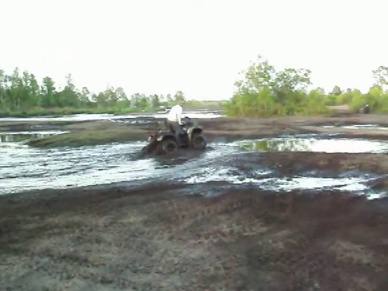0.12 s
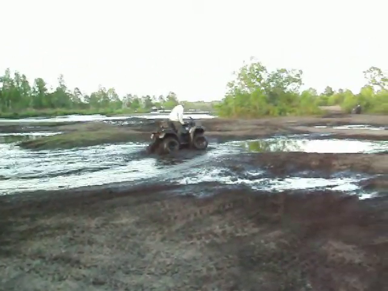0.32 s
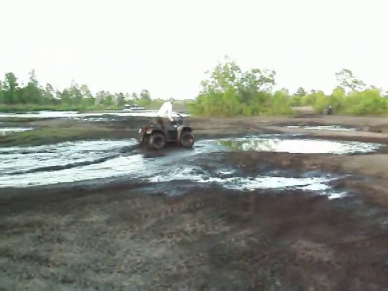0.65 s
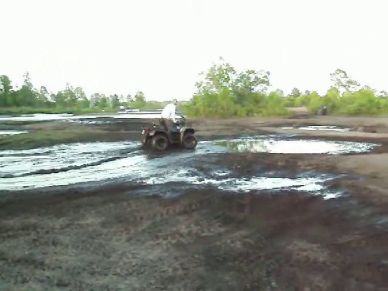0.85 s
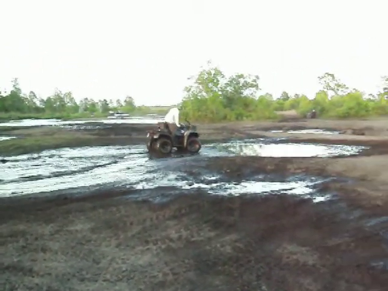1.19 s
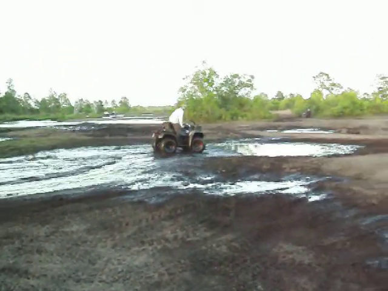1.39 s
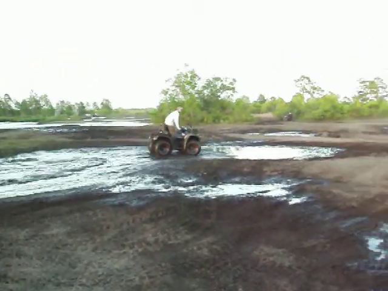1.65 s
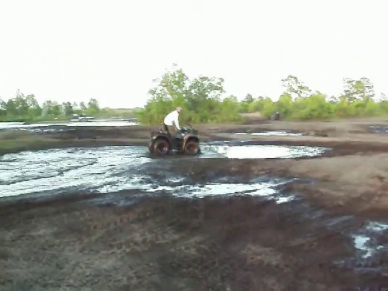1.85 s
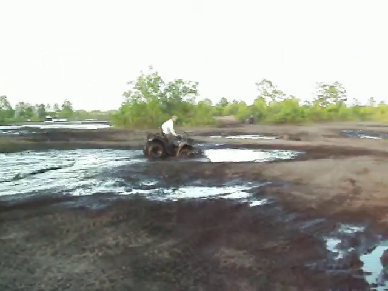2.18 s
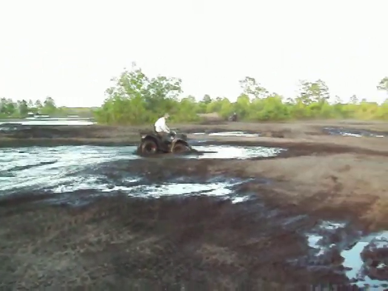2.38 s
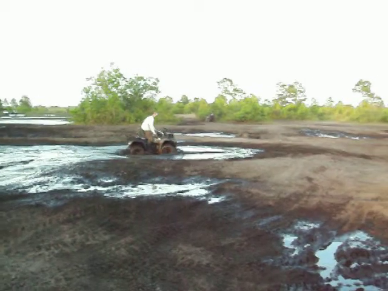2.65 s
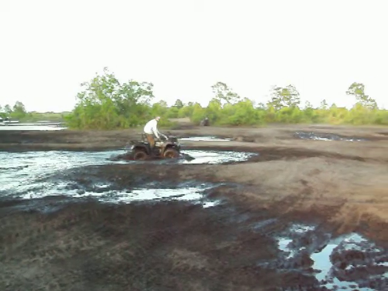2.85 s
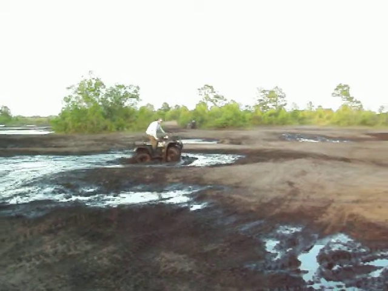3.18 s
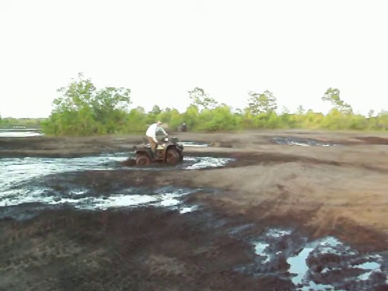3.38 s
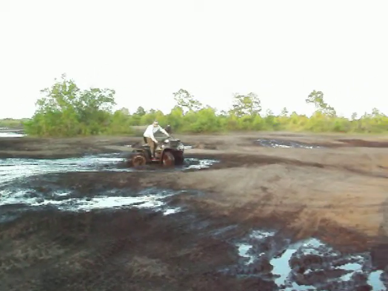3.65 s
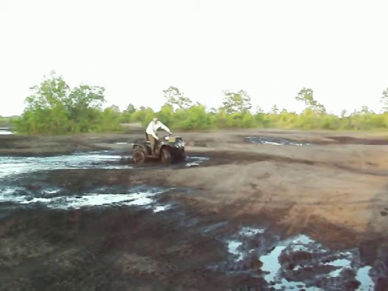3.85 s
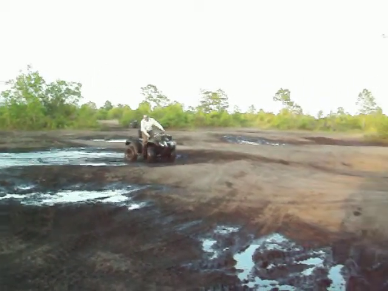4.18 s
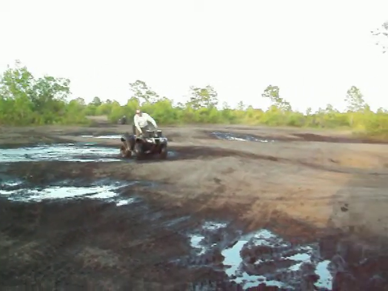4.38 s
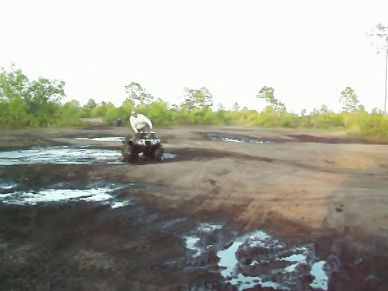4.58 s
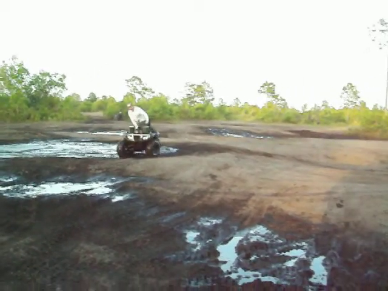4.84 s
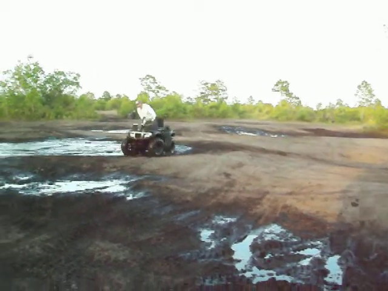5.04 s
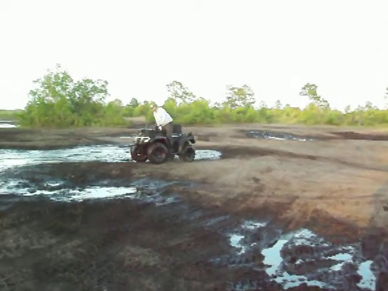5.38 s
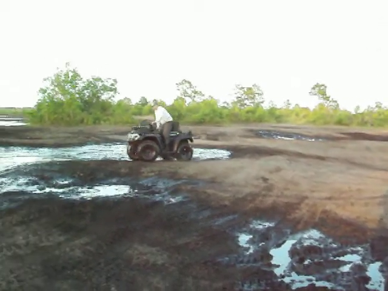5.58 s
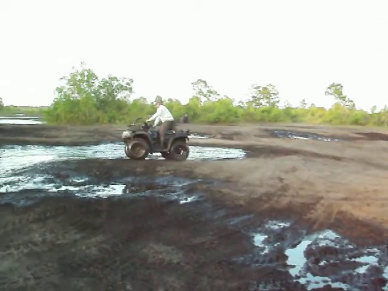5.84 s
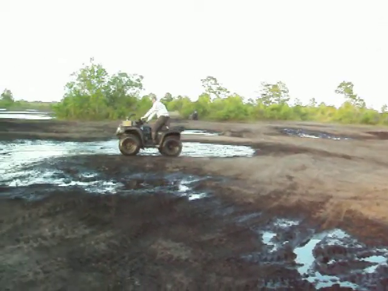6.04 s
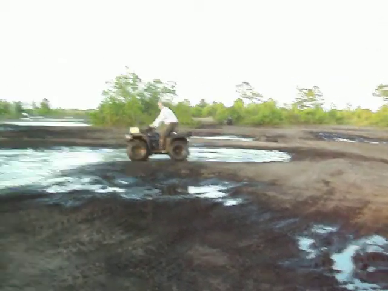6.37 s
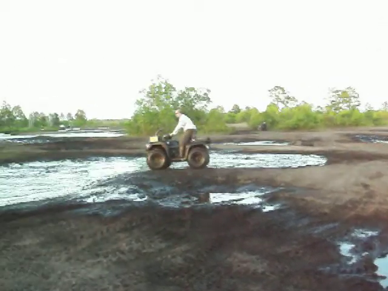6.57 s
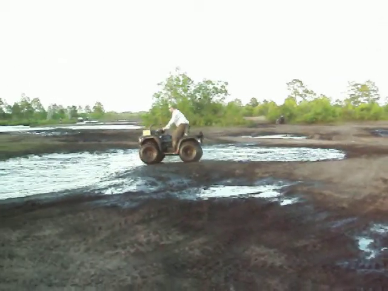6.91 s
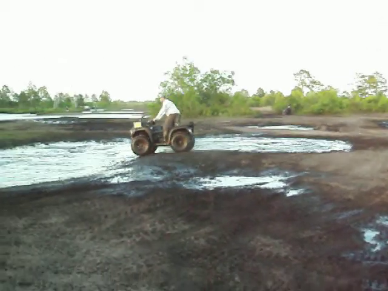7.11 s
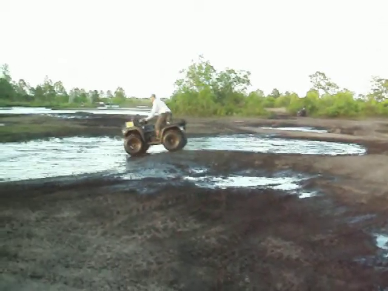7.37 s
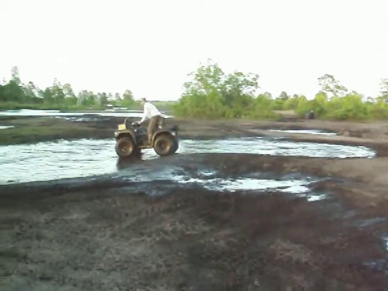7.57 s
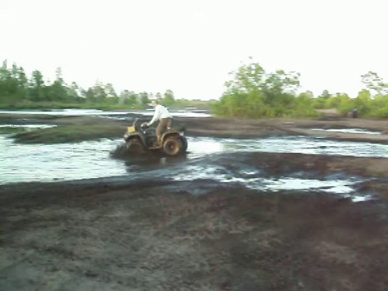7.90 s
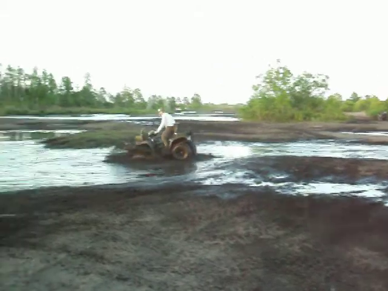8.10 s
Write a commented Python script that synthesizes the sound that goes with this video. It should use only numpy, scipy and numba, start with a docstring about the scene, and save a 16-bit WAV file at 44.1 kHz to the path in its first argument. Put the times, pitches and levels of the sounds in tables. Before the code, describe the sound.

A distant single-cylinder quad bike drives through mud and puddles in open, windy air, captured by a small microphone with muffled, narrow, pumping sound. The engine begins at a middling putter and sags to a slow, dull chug by 0.7 s, as wind flutter and hard slaps burst at 0.15-0.55 s. It climbs from 1.2 s, a thin gear whine gliding upward until about 2, then dipping slightly. Heavy buffets hit from 2.4 to 3.3 s. The growl brightens and peaks in speed and force around 4.5-4.8 s, then eases to a slow chug near 6.5-7 s, where the whine briefly rises again. Close ticks and gritty scuffs occur at 6.7-7.5 s. Strong wind rumble swells around 7.3 s; revs climb to the end at 8.2 s amid flutter. Puffing roar and faint watery hiss run throughout; sharp overload clicks snap near 1.5, 2.4, 3.5, 3.8, 5.0, 5.3 and 7.9 s.

```python
"""A single-cylinder quad bike circles slowly through mud and puddles some way off, in gusty wind.
Orders of its firing rate make the thump, puffed noise the roar and hiss, a gliding tone the whine.
Low noise, flutter and slaps of wind buffet the small microphone; scuffs and ticks sound close to it.
A fast limiter pumps; on a few high crests converter overflow flips the sign with sharp clicks."""
import sys
import numpy as np
from scipy import signal
from scipy.io import wavfile
from scipy.ndimage import uniform_filter1d
from numba import njit

SR = 44100
rng = np.random.default_rng(int(sys.argv[2]) if len(sys.argv) > 2 else 0)


def wav_out(sig):
    """Save sig, one row per channel (or a flat mono array), as 16-bit PCM at SR to the path in sys.argv[1]."""
    wavfile.write(sys.argv[1], SR, np.round(np.clip(np.atleast_2d(sig).T, -1, 1) * 32767).astype(np.int16))


N = 362943


def gain_of(db):
    """Logarithmic level: decibels to an amplitude factor."""
    return 10 ** (np.asarray(db) / 20)


def evened(x):
    """Normalisation by mean power: scales a signal to rms 1."""
    return x / np.sqrt(np.mean(x ** 2) + 1e-20)


def curve(table, column):
    """Linear interpolation: one column of a time table, at every sample."""
    rows = np.array(table)
    return np.interp(np.arange(N) / SR, rows[:, 0], rows[:, column])


def coloured(x, spectrum):
    """Minimum-phase filtering: the log gain sets the phase, so the response is causal; rms 1."""
    f, db = np.transpose(spectrum)
    hz = abs(np.fft.fftfreq(16384, 1 / SR))
    level_db = np.interp(np.log(hz + 1), np.log(f + 1), np.maximum(db, -100))
    log_gain = np.log(gain_of(level_db))
    response = np.exp(np.conj(signal.hilbert(log_gain)))
    taps = np.fft.ifft(response).real[:8192]
    return evened(signal.oaconvolve(x, taps)[:N])


def wander(rate_hz):
    """Smoothed random fluctuation: noise averaged twice over 1 / rate_hz, of rms 1."""
    span = round(SR / rate_hz)
    averaged = uniform_filter1d(rng.standard_normal(N), span)
    return evened(uniform_filter1d(averaged, span))


def low_pass(x, hz, count):
    """Linear-phase band limiting: a steep cut above hz, with count taps."""
    taps = signal.firwin(count, hz, window=("kaiser", 9), fs=SR)
    return signal.oaconvolve(x, taps, "same")


def add(mix, s, sound):
    """Superposition: mixes a sound in from time s."""
    part = mix[round(s * SR):][:len(sound)]
    part += sound[:len(part)]


def firing_rate():
    """Rotational inertia: the flywheel smooths the firing rate, which stays slightly uneven."""
    # Course of the firing rate: start_s, rate_per_s
    firing = [(0, 33.8), (.15, 31.2), (.39, 24.4), (.65, 20), (1.37, 29), (1.55, 31.6), (2.2, 34.7),
              (2.52, 38.5), (2.75, 38.6), (3.32, 42.6), (3.85, 44.7), (4.19, 39.2), (4.4, 41.5),
              (4.6, 49.6), (4.79, 44.1), (4.95, 41.6), (5.48, 39.6), (6.53, 29.5), (6.95, 28.7),
              (7.29, 32.9), (7.78, 43.2), (8.23, 43.9)]
    flywheel_s = .08  # the crank cannot change speed at once
    steady = uniform_filter1d(curve(firing, column=1), round(flywheel_s * SR))
    return steady * (1 + .003 * wander(8))


def exhaust_thump(rate, firings):
    """Harmonic synthesis: orders of the firing rate, weighted by the exhaust's frequency response."""
    # Exhaust as the bike turns and pulls: start_s, thump_db, brightness_0_to_1
    thumps = [(0, -25.5, 0.86), (.6, -30, .05), (1.2, -28, 0.08), (1.7, -27, 0.49), (2.3, -24.5, 0.53),
              (2.6, -23.5, 0.3), (3.3, -19.5, 0.77), (4.25, -23.5, 0.68), (4.45, -19.5, 1),
              (4.75, -16, 0.81), (5.3, -26.5, .5), (6, -28.5, 0.46), (6.5, -24.5, 0.4), (7.2, -30, 0.53),
              (7.7, -24, 0.74), (8.23, -23, 0.7)]
    # Exhaust response on the dull side: pitch_hz, level_db
    dull_exhaust = [(20, -24), (60, -9.5), (95, -10.5), (125, 12.5), (145, 9), (170, -2), (200, -12.5),
                    (260, -21.5), (300, -34), (600, -21.5), (800, -36.5), (900, -42)]
    # Exhaust response on the bright side: pitch_hz, level_db
    open_exhaust = [(20, -23), (60, -3.5), (95, -8.5), (135, -0.5), (170, -5.5), (210, -1.5), (250, -2.5),
                    (300, -28.5), (600, -16.5), (800, -31.5), (900, -48)]
    dull_hz, dull_level = np.transpose(dull_exhaust)
    open_hz, open_level = np.transpose(open_exhaust)
    step = slice(0, N, 64)  # colour changes slowly
    bright = np.clip(curve(thumps, column=2), 0, 1)[step]
    thump = np.zeros(N)
    for k in range(1, 36):
        log_hz = np.log(k * rate[step])
        dull_db = np.interp(log_hz, np.log(dull_hz), dull_level)
        open_db = np.interp(log_hz, np.log(open_hz), open_level)
        order = gain_of(dull_db + bright * (open_db - dull_db))
        lag = 0.443 * k ** 1.3  # upper orders lag: the pulse rings out
        thump += np.repeat(order, 64)[:N] * np.cos(2 * np.pi * k * firings - lag)
    return thump * gain_of(curve(thumps, column=1) + 0.32 * wander(45))


def roar_and_hiss(firings):
    """Amplitude modulation: engine roar and tyre and water hiss are noises that puff with each firing."""
    # Noise levels before their small wander: start_s, roar_db, hiss_db
    levels = [(0, -30, -37.5), (.4, -26.5, -34.5), (1.6, -34.5, -42), (2.3, -33, -37.5), (2.6, -28.5, -34),
              (2.9, -27, -35.5), (3.1, -27, -34.5), (3.45, -32, -37.5), (3.76, -26, -35),
              (4.1, -29.5, -34.5), (4.3, -31, -38), (4.47, -23.5, -35.5), (4.7, -27, -35.5),
              (5, -27.5, -37.5), (5.6, -32, -42), (5.9, -30, -37.5), (6.3, -34, -44.5), (6.6, -26.5, -39),
              (7.2, -27, -41.5), (7.6, -29, -38.5), (8.23, -28, -33.5)]
    # Relative spectrum of the engine roar: pitch_hz, level_db (per Hz)
    roar_spectrum = [(180, -45.5), (300, -23), (366, -8), (439, -10), (468, -6.5), (557, -1.5), (674, -2),
                     (759, -2), (822, -4.5), (876, -8.5), (1050, -7.5), (1220, -11), (2000, -21),
                     (2600, -49.5), (4400, -120)]
    # Relative spectrum of the tyre and water hiss: pitch_hz, level_db (per Hz)
    hiss_spectrum = [(1000, -45.5), (1700, -9), (1870, -39), (2020, -17.5), (2200, -1.5), (2770, 2),
                     (3060, 0.5), (3940, -4.5), (4890, -2), (5830, -15.5), (7580, -52), (12800, -120)]
    puff = np.exp(-(firings % 1) / 0.62)  # decays through each firing period
    roar = coloured((1.1 + puff) * rng.standard_normal(N), roar_spectrum)
    roar *= gain_of(curve(levels, column=1) + 0.72 * wander(15))
    hiss = coloured((1.6 + puff) * rng.standard_normal(N), hiss_spectrum)
    hiss *= gain_of(curve(levels, column=2) + 0.31 * wander(38))
    return roar + hiss


def engine():
    """Common periodicity: thump, roar and hiss share the phase of one running count of firings."""
    rate = firing_rate()
    firings = np.cumsum(rate) / SR
    return exhaust_thump(rate, firings) + roar_and_hiss(firings)


def whine():
    """Frequency modulation: a thin gear tone glides while the bike pulls, wavering in level and pitch."""
    # Glides of the gear whine: start_s, end_s, from_hz, to_hz, level_db
    whines = [(1.151, 2.052, 639, 835, -38), (2.002, 2.293, 775, 742, -37), (6.554, 6.908, 690, 822, -30.5)]
    out = np.zeros(N)
    pitch, level = 1 + 0.0056 * wander(25), gain_of(2.0 * wander(25))
    for start, end, from_hz, to_hz, db in whines:
        span = slice(round(start * SR), round(end * SR))
        remaining = np.linspace(1, 0, len(pitch[span])) ** 1.9  # the glide eases off
        hz = (to_hz + (from_hz - to_hz) * remaining) * pitch[span]
        envelope = gain_of(db) * signal.windows.tukey(len(hz), .4) * level[span]
        add(out, start, envelope * np.sin(2 * np.pi * np.cumsum(hz) / SR))
    return out


def slap_pulse(rise_s):
    """Transient pressure: a slap rises in a few ms and sags back, with no steady pressure left."""
    t = np.arange(1500) / SR
    slap = np.clip(t / rise_s, 0, 1) ** 2.27 * np.exp(-np.maximum(t - rise_s, 0) / 0.003)
    # the capsule passes no steady pressure
    return slap - slap.sum() * signal.windows.hann(1500) / 750


def wind():
    """Turbulent pressure: lumpy low noise, bursts of flutter, and slaps on the microphone."""
    # Course of the wind: start_s, rumble_db, flutter_db
    winds = [(0, -24.5, -35), (.23, -18, -13), (.46, -16.5, -23), (.56, -15, -28), (1.3, -21.5, -32.5),
             (2.33, -23, -31), (2.42, -21, -22.5), (2.93, -9.5, -22), (3.2, -19, -22.5), (3.83, -12, -22.5),
             (4.4, -16.5, -22), (5.02, -12.5, -22), (5.3, -14.5, -21.5), (7.1, -10.5, -21.5),
             (7.3, -5.5, -22), (7.6, -14, -12.5), (7.93, -15.5, -26.5), (8.23, -13, -13.5)]
    # Relative spectrum of the rumble: pitch_hz, level_db (per Hz)
    rumble_spectrum = [(5, -26), (12, -10), (20, -3), (32, 0), (55, -4), (90, -11), (130, -24), (250, -44),
                       (1500, -90)]
    # Relative spectrum of the flutter: pitch_hz, level_db (per Hz)
    flutter_spectrum = [(40, -13.5), (80, 1.5), (150, 0), (250, -6), (400, -9), (700, -18.5), (1200, -31),
                        (2500, -42.5), (6000, -72.5)]
    # Hardest slaps of wind: peak_s, push_or_pull_sign, level_db (ahead of the limiter)
    buffets = [(.149, -1, -11.5), (.172, -1, -1), (.215, -1, -4), (.264, 1, -0.5), (.305, 1, 4),
               (0.359, -1, 2), (0.403, 1, -1.5), (.439, -1, -2.5), (0.458, 1, -1.5), (.481, 1, 2.5),
               (.534, 1, -1.5), (0.808, -1, -5.5), (1.004, 1, -7.5), (1.515, 1, -9.5), (2.387, -1, -4.5),
               (2.426, 1, -3.5), (2.519, -1, -7), (2.598, -1, 2.5), (2.623, -1, 4), (2.671, -1, 6),
               (2.824, -1, -1.5), (2.849, -1, 3), (2.886, -1, 2), (2.977, -1, 5), (3.051, -1, 1),
               (3.15, -1, 1), (3.273, -1, -2), (3.471, 1, 2), (3.512, -1, -4), (3.573, -1, -15),
               (3.717, -1, -18), (3.74, 1, 4.5), (3.843, 1, -11), (4.056, 1, 0), (4.286, -1, -3),
               (4.828, -1, 0), (4.95, -1, -4), (4.996, 1, -2), (5.029, 1, 4), (5.326, 1, 3), (5.737, 1, 0),
               (5.887, 1, -2), (6.513, -1, 1.5), (6.594, -1, 2), (6.7, -1, -5), (6.902, 1, 3),
               (7.173, 1, 1), (7.244, -1, -1), (7.277, 1, 2), (7.881, 1, 1.5), (7.856, 1, -3),
               (7.943, -1, -5), (7.981, 1, -10), (8.067, 1, 4.5), (8.211, 1, -3)]
    lesser_slaps_per_s, lesser_slaps_db = 30, 0.5  # level relative to the flutter
    rise_s = .003
    lumps = gain_of(2.2 * wander(18))
    out = coloured(lumps * rng.standard_normal(N), rumble_spectrum) * gain_of(curve(winds, column=1))
    flutter_level = gain_of(curve(winds, column=2))
    eddies = gain_of(3.1 * wander(43))  # small eddies tear past the port in bursts
    out += coloured(eddies * rng.standard_normal(N), flutter_spectrum) * flutter_level
    slap = slap_pulse(rise_s)
    landings = rng.random(N) < lesser_slaps_per_s / SR  # lesser slaps land at random
    strikes = rng.standard_normal(N) * landings
    lesser = evened(signal.oaconvolve(strikes, slap)[:N])
    out += gain_of(lesser_slaps_db) * lesser * flutter_level
    for s, sign, db in buffets:
        add(out, s - rise_s, np.sign(sign) * gain_of(db) * slap)
    return out


def scuffs():
    """Resonant filtering: grainy noise excites three resonances, fading in and out of each scuff."""
    # Gritty scuffs close to the microphone: start_s, end_s, level_db, swell_db, top_resonance_lift_db
    scuff_times = [(6.742, 6.832, -32.5, 1, 2), (6.845, 6.88, -46, -14, -18), (7.3, 7.386, -34, 1, -10),
                   (7.381, 7.468, -28.5, -0.5, -10.5)]
    # Resonances of a scuff: pitch_hz, width_hz, level_db
    scuff_rings = [(2800, 700, 0), (3880, 260, 0), (4900, 1200, -3)]
    edge = 0.3  # share of a scuff spent fading in and out
    out = np.zeros(N)
    grit = gain_of(1.8 * wander(700)) * rng.standard_normal(N)
    for start, end, db, swell_db, top_db in scuff_times:
        noise = grit[round(start * SR):round(end * SR)]
        rings = []
        for hz, width_hz, ring_db in scuff_rings:
            b, a = signal.iirpeak(hz, hz / width_hz, SR)
            rings.append(gain_of(ring_db) * signal.filtfilt(b, a, noise))
        swell = gain_of(db + np.linspace(-swell_db, swell_db, len(noise)))
        shape = swell * signal.windows.tukey(len(noise), edge)
        add(out, start, shape * evened(rings[0] + rings[1] + gain_of(top_db) * rings[2]))
    return out


def ticks():
    """Damped oscillation: small ticks ring as sines that lose 60 dB in 7.5 ms."""
    # Small ticks: start_s, level_db (ahead of the limiter), pitch_hz
    tick_times = [(6.732, -12.5, 2540), (7.03, -8, 1270), (7.032, -18, 2900), (7.079, -23, 4900),
                  (7.134, -17.5, 3880), (7.156, -5, 2670), (7.156, -9, 3750), (7.158, -10, 1390),
                  (7.453, -17, 3000)]
    out, t = np.zeros(N), np.arange(300) / SR
    for s, db, hz in tick_times:
        add(out, s, gain_of(db - 60 * t / 0.0075) * np.sin(2 * np.pi * hz * t))
    return out


def scene():
    """Superposition: the pressures of all sources add at the microphone."""
    return (engine() + whine() + wind() + scuffs() + ticks())[None]


@njit
def limiter(x, knee, pull, lag, recover):
    """Feedback gain control: output above the knee charges a leaky control that cuts gain a little late."""
    y, charge, cut = np.zeros_like(x), 0., 0.
    for i in range(len(x)):
        y[i] = x[i] * np.exp(-cut)
        charge = charge * recover + pull * max(abs(y[i]) - knee, 0.)
        cut += lag * (charge - cut)
    return y


def overflow(y, full_scale):
    """Numeric overflow: at listed times the wave is drawn to full scale and a sample's sign flips."""
    # Overflowing samples: time_s
    flip_times = [1.51475, 2.42849, 3.47012, 3.84083, 4.99700, 4.99719, 4.99738, 5.02840, 5.32392, 5.32454,
                  7.87937, 7.88000]
    converter_hz = 11025
    offsets = np.arange(-120, 121)
    t = offsets / SR
    crest, flips = np.zeros(N), np.zeros(N)
    for s in flip_times:
        at = round(s * SR) + offsets
        crest[at] = np.maximum(crest[at], np.exp(-(t / 0.00049) ** 2))
        # one converter sample, band-limited: a windowed sinc
        flips[at] -= 1.42 * np.sinc(t * converter_hz) * np.exp(-(t / 0.00058) ** 2)
    return y * (1 - crest) + full_scale * crest + flips


def record(dry):
    """Nonlinear and band-limited transmission: limiter, converter, overflow clicks, clipping, final cut."""
    full_scale, band_hz, edge_hz = .73, 5950, 16700
    lag, recover = 1 / (0.002 * SR), np.exp(-1 / (0.02 * SR))  # time constants 2 ms and 20 ms
    y = limiter(gain_of(9.5) * dry[0], 0.21, 2200 / SR, lag, recover)
    y = y / (1 + (y / .7) ** 10) ** (1 / 10)  # the preamplifier rounds off high crests
    y = low_pass(y, band_hz, count=401)
    y = overflow(y, full_scale)
    return low_pass(np.clip(y, -full_scale, full_scale), edge_hz, count=255)[None]


dry = scene()
out = record(dry)
wav_out(out)
```